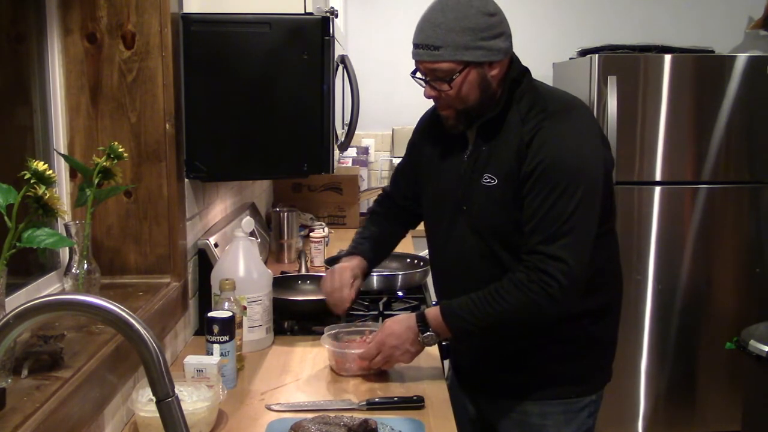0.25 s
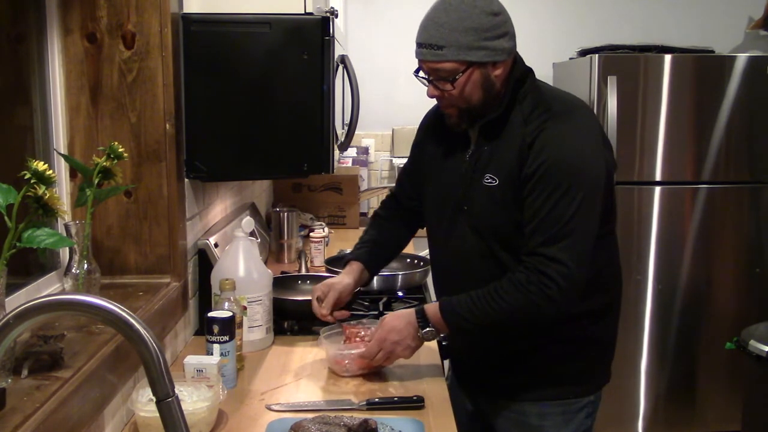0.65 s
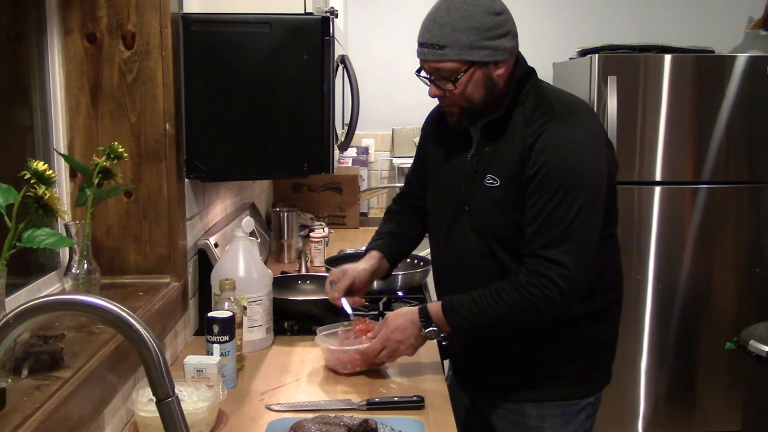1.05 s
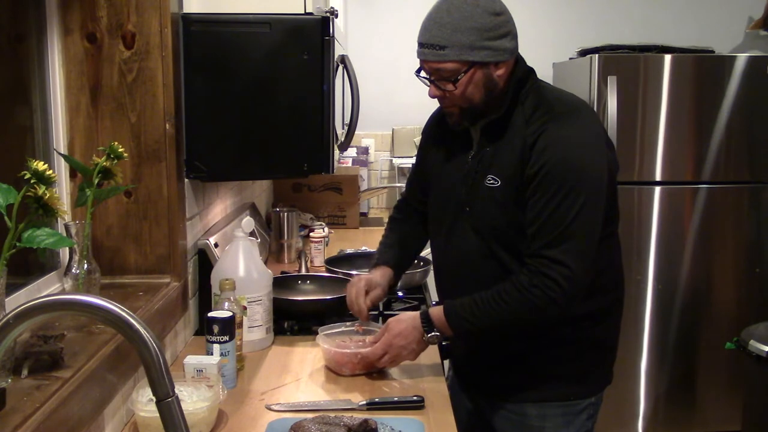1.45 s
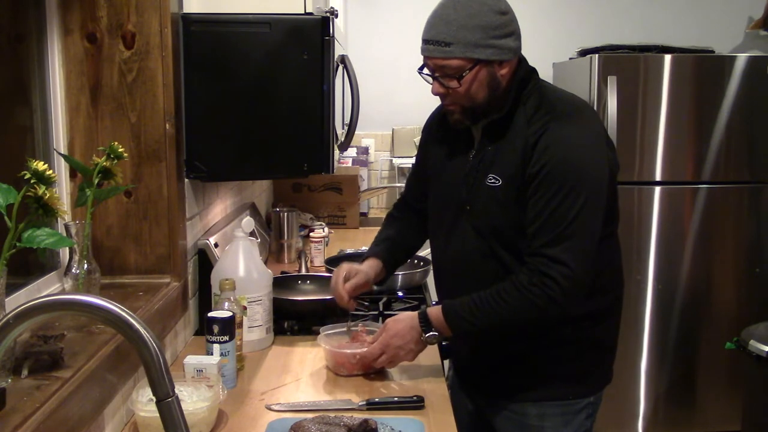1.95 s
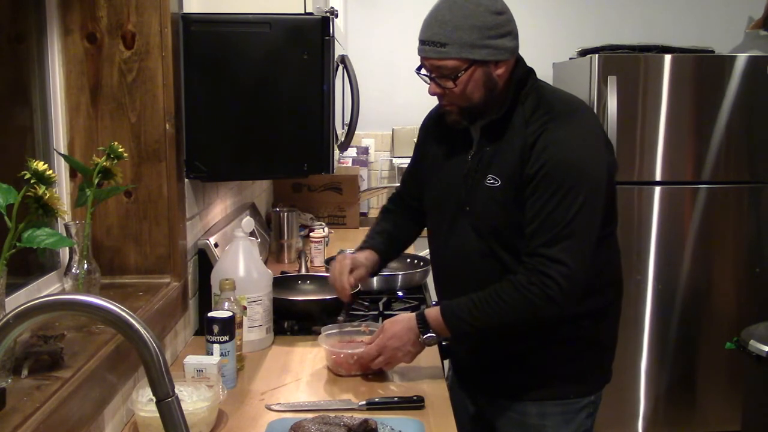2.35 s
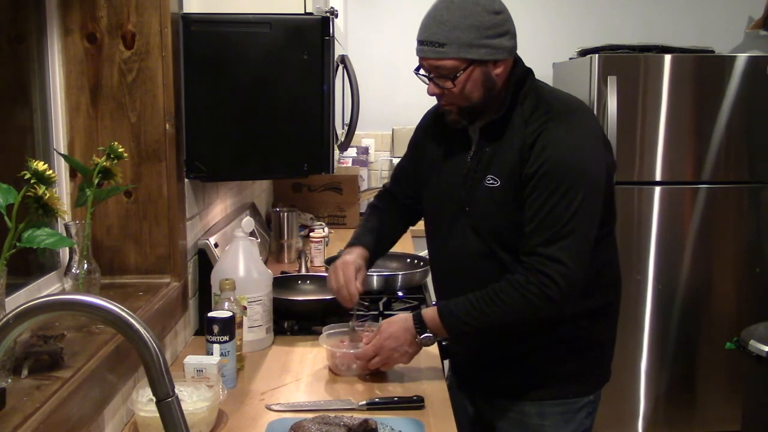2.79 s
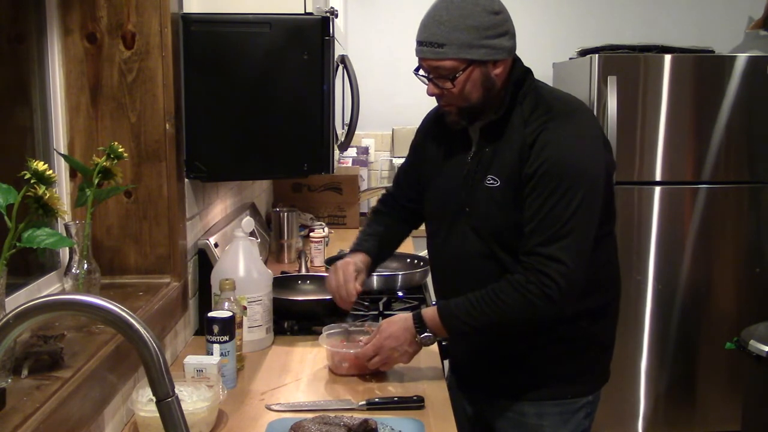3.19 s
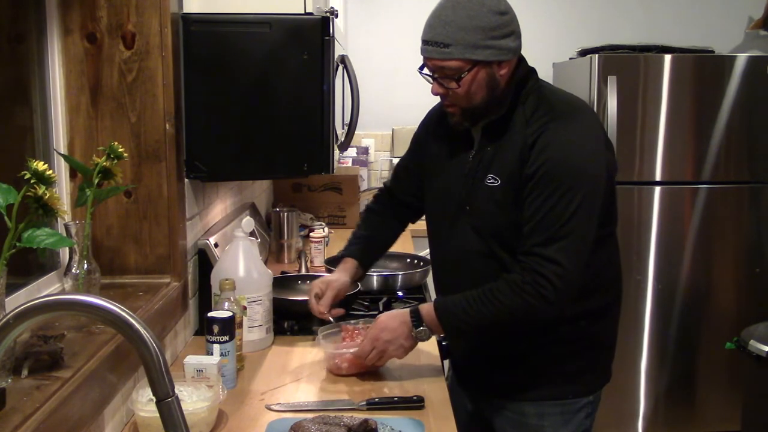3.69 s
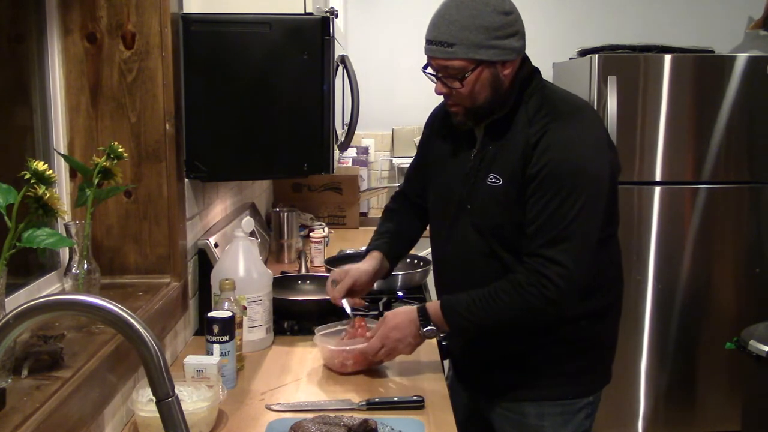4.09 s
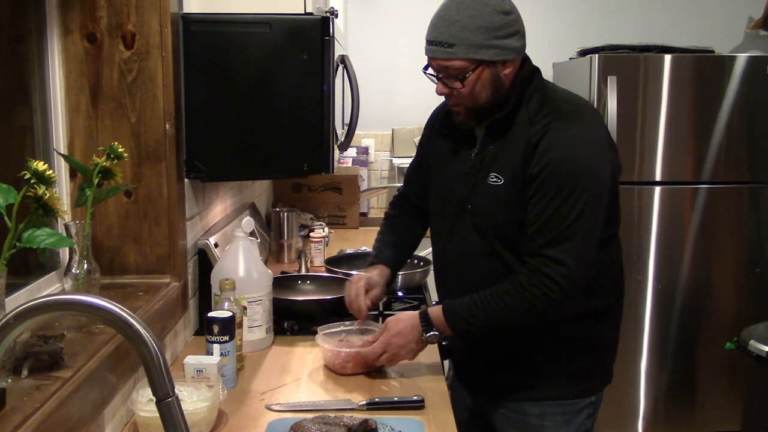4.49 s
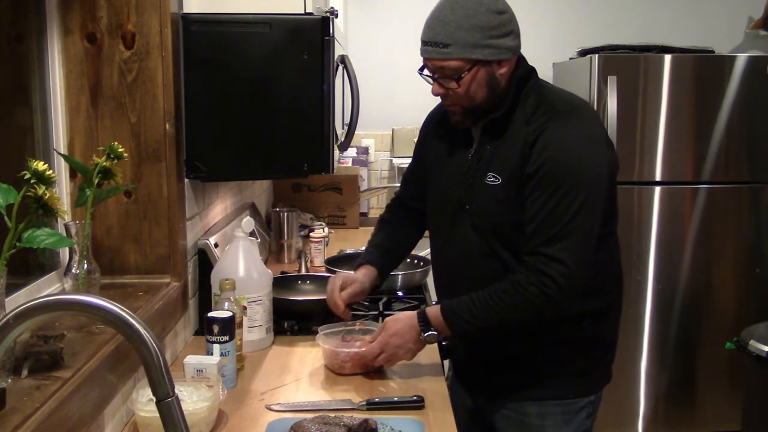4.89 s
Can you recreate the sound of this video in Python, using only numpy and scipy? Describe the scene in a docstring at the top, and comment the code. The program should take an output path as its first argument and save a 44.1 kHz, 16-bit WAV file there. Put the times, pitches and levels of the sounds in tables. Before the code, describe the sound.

Over the steady hum of a refrigerator, a plastic tub gives a hollow knock on a kitchen counter, followed by faint squeaky scraping as a metal spoon works through chopped vegetables. Irregular clacks and knocks follow, then another squeaky scrape, and finally a sharp clack and the loudest knock. Everything comes from straight ahead, a few metres off, with the short echo of a small kitchen.

```python
"""A plastic tub knocks hollowly on a kitchen counter as a metal spoon stirs chopped vegetables in it.
The spoon clacks on the tub's wall; between the blows it scrapes, squeaks and taps through the wet mix.
The stereo microphone stands a few metres off, with the tub nearly straight ahead.
The small bright kitchen echoes it all over the hum of a refrigerator."""
import sys
import numpy as np
from scipy import signal
from scipy.fft import rfft, irfft
from scipy.io import wavfile
from scipy.ndimage import uniform_filter1d

SR = 44100
rng = np.random.default_rng(int(sys.argv[2]) if len(sys.argv) > 2 else 0)


def transcribe(signal):
    """Save signal, clipped to [-1, 1], as a 16-bit WAV file at the path in sys.argv[1]."""
    frames = np.atleast_2d(signal).T
    limited = np.clip(frames, -1, 1)
    pcm = np.round(limited * 32767).astype(np.int16)
    wavfile.write(sys.argv[1], SR, pcm)


N = 226892
T = np.arange(N) / SR
RING_T = T[:SR // 2]  # the half second given to one blow or echo


# Blows at the counter: t/s, level/dB, spoon share (0 = tub knocks on counter, 1 = spoon clacks on tub),
# weight/dB of bass, hardness/(dB per octave of treble), pitch ratio of the struck place
KNOCKS_AND_CLACKS = [(0.3152, -19.5, .03, -0.5, 0.3, 0.98), (0.414, -30, 0.14, -4, -3, 1),
                     (1.683, -31, 0.37, -3.5, 3.5, 0.94), (1.724, -27, 0.55, 2.5, 1, 1.03),
                     (1.795, -39.5, 0.73, 7.5, 2, 0.9), (2.193, -30.5, 1, -2.5, 1.3, 1.15),
                     (2.4429, -35, 0.058, -2.5, -3.2, 1.06), (2.5132, -43.5, 0.15, -7, 4.5, 0.9),
                     (2.5506, -26, 0.04, 1.5, 1.5, 1.08), (2.642, -36, 0.82, 3.5, 2.3, 1.12),
                     (3.035, -35.5, 0.67, -7.5, 1.8, 1.05), (3.271, -26, 0.11, -9, -1.7, 0.88),
                     (3.343, -18.5, 0.23, 2.5, -0.9, 1.17), (3.5, -48.5, .5, -3, 7.5, 0.93),
                     (3.545, -38, 0.17, -4, 2.5, 1.14), (4.4457, -21.5, 0.94, -2.5, 0, 1.13),
                     (4.7735, -16, .02, -3, 1, 1.02), (4.826, -31.5, 0.87, 0, -2.5, 1.34)]
# Modes of the tub standing on the counter: f/Hz, relative level/dB, t60/s
TUB_MODES = [(206.3, -7, 0.45), (241.9, -3.5, 0.3), (269.4, 1, .27), (325, -7.5, 0.35), (388.8, 6, 0.13),
             (451, -9.5, 0.35), (528, -14.5, 0.34), (608, -2.5, 0.044), (660, 0.5, 0.12), (746, -1, 0.11),
             (931, -12.5, 0.28), (1150, -19.5, 0.047), (1316, 3, 0.11), (1407, -19.5, 0.6)]


def blows(crack_db=-0.5, ring_db=1.0, crack_bass_db=-6, swell_s=0.0085):
    """Each blow cracks in its own colour and rings the tub, whose modes take up that colour."""
    out = np.zeros(N)
    mode_hz, mode_db, mode_t60 = np.transpose(TUB_MODES)
    for start, level_db, share, weight_db, hardness_db, pitch in KNOCKS_AND_CLACKS:
        hz, db = blow_colour(share, weight_db, hardness_db, pitch)
        room = kitchen_echo()  # the tub turns in the hand, so each blow meets other echoes
        crack = np.column_stack([hz, db + crack_bass_db * bass(hz)])  # the modes carry most of the bass
        add(out, start, undb(level_db + crack_db) * contact(room, crack))
        scatter_db, detune, phases = rng.standard_normal((3, len(TUB_MODES)))
        drive_db = level_db + np.interp(np.log(mode_hz), np.log(hz), db + 10 * np.log10(hz))
        gains = undb(drive_db + mode_db + ring_db + scatter_db)
        shifted_hz = mode_hz * (1 + 0.0056 * detune)  # grip and filling shift the modes a little
        ring = sum(gain * np.sin(2 * np.pi * f * RING_T + np.pi * phase) * fade(t60)
                   for gain, f, phase, t60 in zip(gains, shifted_hz, phases, mode_t60))
        add(out, start, ring * (1 - np.exp(-RING_T / swell_s)))
    return out


# Spectra of the two kinds of contact: f/Hz, hollow knock level/dB, sharp clack level/dB
BLOW_SPECTRA = [(28, -45, -23), (54.3, -18, 4), (108, -27, -12), (159, -8.5, -6), (234, -1.5, -3.5),
                (505, 0, -4), (710, 2.5, -4), (947, -4, -5), (1296, -8.5, 3), (2080, -16, -3.5),
                (3300, -25, -9.5), (5600, -26, -20.5), (8400, -31.5, -29.5), (14500, -52, -52)]


def blow_colour(share, weight_db, hardness_db, pitch, treble_hz=1650):
    """Unit-power blend of knock and clack: weight adds bass, hardness treble, a stiff place pitch."""
    hz, knock, clack = np.transpose(BLOW_SPECTRA)
    db = knock + np.clip(share, 0, 1) * (clack - knock)
    db = db + weight_db * bass(hz) + hardness_db * np.maximum(np.log2(hz / treble_hz), 0)
    hz = hz * pitch ** (1 - bass(hz))
    power = np.sum(undb(db) ** 2 * np.gradient(hz))
    return hz, db - 10 * np.log10(power)


def bass(hz, edge_hz=570):
    """1 where the tub moves as a whole, 0 above, changing over half an octave."""
    return np.clip(.5 - 2 * np.log2(hz / edge_hz), 0, 1)


def contact(room, spectrum, chatter=0.3, chatter_t60=0.011, touch=0.65, spread_db=1.4, nominal_s=.03):
    """A sharp touch and a moment of chatter, heard across the room in the given spectrum."""
    force = chatter * rng.standard_normal(len(RING_T)) * fade(chatter_t60)
    force[0] += touch
    burst = whiten(signal.fftconvolve(force, room)[:len(RING_T)])
    # each place on the tub's wall favours other upper resonances
    hz = np.geomspace(900, 12000, 26)
    ripple_db = spread_db * rng.standard_normal(len(hz)) * signal.windows.tukey(len(hz), alpha=0.1)
    place_db = along(np.column_stack([hz, ripple_db]), len(RING_T))
    gain = SR * np.sqrt(nominal_s / 2)  # the energy of that spectrum held for nominal_s
    return gain * colour(burst, along(spectrum, len(RING_T)) + place_db)


# Soft taps of the spoon through the vegetables: t/s, relative level/dB, f/Hz
SPOON_TAPS = [(0.263, -33, 1070), (0.5256, -47, 1240), (0.7219, -48.5, 1150), (0.8755, -53.5, 1150),
              (0.9718, -53.5, 1150), (1.0027, -56.5, 1270), (1.1524, -52.5, 1000), (1.2624, -54, 1160),
              (1.2891, -52.5, 1320), (1.3184, -54, 1100), (3.7869, -54, 1080), (3.9371, -42.5, 1165),
              (4.384, -51, 1100), (4.668, -42, 1130), (4.7145, -50.5, 1230), (5.0848, -44.5, 950),
              (5.121, -53, 865), (5.136, -40.5, 1060)]
# Spectrum of one tap: multiple of its pitch, level/dB
TAP_SPECTRUM = [(.2, -16), (.6, -4.5), (1, 0), (1.22, -0.5), (1.55, -18.5), (4, -31.5), (10, -45)]


def taps(room, tap_db=-27):
    """Cushioned by the filling, a tap is one broad, dull resonance."""
    out = np.zeros(N)
    for start, db, hz in SPOON_TAPS:
        spectrum = [(ratio * hz, ratio_db) for ratio, ratio_db in TAP_SPECTRUM]
        add(out, start, undb(db + tap_db) * contact(room, spectrum, chatter=0.14))
    return out


# Spoon strokes: t/s, length/s, hiss level/dB, relative rasp level/dB, t60/s of the mix settling
SPOON_STROKES = [(0.546, 0.075, -51.5, -47.5, 0.86), (0.68, 0.015, -57, -59, 4.3),
                 (1.41, 0.026, -59.5, -54, 0.46), (2.138, 0.038, -66, -46.5, 0.22),
                 (2.948, 0.082, -62, -53, .2), (3.567, .16, -49.5, -48.5, 0.73),
                 (4.391, 0.043, -59.5, -51, 0.29)]
# Spectra of the hiss along the tub's wall and of the rasp through the mix: f/Hz, level/dB
WALL_HISS = [(300, -14), (1500, 4.5), (3000, -2.5), (5200, 0.5), (8000, -3.5), (10000, -9), (14000, -17),
             (16000, -29)]
MIX_RASP = [(400, -40), (1000, 5), (1600, 1.5), (2600, -1), (4500, -9.5), (9000, -27)]


def stirring(room, rasp_db=-4.5, wet_db=-67, catch_db=2.0, attack_s=0.031, hiss_t60=0.095):
    """The spoon sticks and slips along the wall; the mix settles after it and crackles throughout."""
    hiss, rasp = np.zeros((2, N))
    for start, length, wall_db, mix_db, settle_t60 in SPOON_STROKES:
        hiss += undb(wall_db) * gesture(start, length, attack_s, hiss_t60)
        rasp += undb(mix_db + rasp_db) * gesture(start, length, attack_s, settle_t60)
    squeaking = squeaks()
    scrape = hiss * shaped(grains(500), WALL_HISS) + rasp * shaped(grains(1200), MIX_RASP)
    scrape *= undb(catch_db * walk(70))  # the spoon catches on the pieces
    wet_spectrum = [(500, -15), (1400, -0.5), (5000, -16), (10000, -17.0), (16000, -26)]
    crackle = undb(wet_db + 2 * walk(5.5)) * shaped(grains(64), wet_spectrum)
    return signal.fftconvolve(scrape + squeaking + crackle, whiten(room))[:N]


def grains(per_second):
    """Tiny slips and wet pops of unequal size."""
    size = undb(3.5 * np.minimum(rng.exponential(size=N), 4))
    return (rng.random(N) < per_second / SR) * rng.choice([-1, 1], N) * size


# Squeaks of the spoon: t/s, length/s, f/Hz, level/dB, wander as a share of the pitch
SPOON_SQUEAKS = [(0.534, 0.028, 3540, -45.5, 0.029), (0.535, 0.025, 5150, -41, 0.07),
                 (0.535, 0.015, 9500, -46, 0.087), (0.663, 0.028, 4620, -51, .02),
                 (0.671, .031, 8800, -50, 0.083), (0.698, .04, 9240, -58, .06),
                 (0.75, .025, 10100, -63, .03), (3.618, 0.039, 6700, -44.5, .11),
                 (3.642, 0.041, 4950, -41.5, 0.173), (3.675, 0.037, 3730, -42.5, .17),
                 (3.727, 0.019, 8500, -44, .18)]


def squeaks():
    """Metal sticks and slips on wet plastic in brief tones of unsteady pitch."""
    out, wander = np.zeros(N), walk(900)
    for start, length, hz, db, spread in SPOON_SQUEAKS:
        pitch = hz * (1 + spread * wander[int(start * SR):int((start + length) * SR)])
        tone = np.sin(2 * np.pi * np.cumsum(pitch) / SR)
        add(out, start, undb(db) * tone * signal.windows.hann(len(tone)))
    return out


# Drags of the tub across the counter: t/s, length/s, level/dB
TUB_DRAGS = [(1.405, .03, -61), (1.764, 0.42, -56.5)]


def counter_rumble(attack_s=0.022, t60=0.22):
    """The worktop answers the dragged tub with a low rumble."""
    envelope = sum(undb(db) * gesture(start, length, attack_s, t60) for start, length, db in TUB_DRAGS)
    spectrum = [(30, -33), (55, -4), (85, -14), (110, -1.5), (160, -20), (400, -45), (2000, -80)]
    return envelope * shaped(rng.standard_normal(N), spectrum)


# How long the small kitchen rings: f/Hz, t60/s
KITCHEN_DECAY = [(100, 0.11), (400, 0.5), (1500, 0.36), (3000, 0.4), (6000, 0.31), (14000, 0.24)]


def kitchen_echo(slap_db=0.5, near_db=-2, near_t60=0.11, tail_db=-3.5, build_s=0.015):
    """Tub to microphone: direct sound, slaps off counter and wall, cupboard scatter, a diffuse tail."""
    size = len(RING_T)
    early = np.zeros(size)
    early[0] = 1
    for lag_s, db in [(.0016, -1), (.0046, -4), (.0072, -2.5)]:
        add(early, lag_s, undb(slap_db + db) * unit(rng.standard_normal(64)) / np.sqrt(64))
    noise, t60 = rfft(rng.standard_normal(size)), along(KITCHEN_DECAY, size)
    octave = np.log2(np.arange(len(noise)) + 1).astype(int)
    tail = sum(irfft(noise * (octave == k), size) * fade(t60[octave == k].mean())
               for k in np.unique(octave))
    near = rng.standard_normal(size) * fade(near_t60)
    build = 1 - np.exp(-RING_T / build_s)
    diffuse = undb(near_db) * unit(near * build) + undb(tail_db) * unit(tail * build)
    return early + diffuse / np.sqrt(size)


# Room tone, the fan's noise filling the kitchen: f/Hz, relative level/dB
ROOM_TONE = [(25, -27), (50, -23.5), (90, -17.5), (160, -15.5), (250, -4), (400, -6), (520, -9.5),
             (900, -11.5), (1500, -20), (2500, -23), (4200, -31), (8000, -37), (11000, -42.5), (16000, -52)]
# Tones of the refrigerator's motor and fan: f/Hz, level/dB
MOTOR_TONES = [(215.3, -66), (253, -60), (360.7, -55), (613.7, -69)]
# Mains hum, swelling for a while: t/s, level/dB
MAINS_SWELL = [(0, -66), (.5, -67), (.7, -61.5), (1.2, -59.5), (1.4, -72), (5.14, -68)]


def refrigerator(air_db=-50.38, side_db=-16.5, mains_hz=119):
    """Steady fan noise with slightly wavering motor tones and a mains hum, in stereo."""
    air = undb(air_db) * shaped(rng.standard_normal(N), ROOM_TONE)
    # left and right agree best in the low middle range
    side_spectrum = [(hz, db + np.interp(np.log(hz), np.log([60, 250, 3000]), [7, -9, 0]))
                     for hz, db in ROOM_TONE]
    side = undb(air_db + side_db) * shaped(rng.standard_normal(N), side_spectrum)
    motor = sum(undb(db + 0.7 * walk(4.55)) * np.sin(2 * np.pi * hz * T + 0.63 * walk(2.8))
                for hz, db in MOTOR_TONES)
    mains = undb(np.interp(T, *np.transpose(MAINS_SWELL))) * np.sin(2 * np.pi * mains_hz * T)
    return air + np.sqrt(2) * (motor + mains) + side * np.array([[1], [-1]])


def gesture(start, length, attack_s, t60):
    """Envelope of a hand movement: swells up to its start, holds, dies away."""
    attack = np.clip(1 + (T - start) / attack_s, 0, 1) ** 2
    return attack * np.exp(-np.log(1000) * np.maximum(T - start - length, 0) / t60)


def fade(t60):
    """An exponential decay, 60 dB down after t60 seconds."""
    return np.exp(-np.log(1000) * RING_T / t60)


def walk(rate_hz):
    """A random wander of rms 1."""
    hold = int(SR / rate_hz)
    steps = np.repeat(rng.standard_normal(N // hold + 1), hold)
    return unit(uniform_filter1d(steps, hold)[:N])


def along(points, size):
    """Read (Hz, value) points at the bins of a transform, on a log axis."""
    hz, value = np.transpose(points)
    return np.interp(np.log(np.fft.rfftfreq(size, 1 / SR) + 1), np.log(hz), value)


def colour(x, db):
    """Causal filter with the given gain per bin, from the cepstrum."""
    cepstrum = irfft(np.log(undb(db)), len(x))
    cepstrum[1:len(x) // 2] *= 2
    cepstrum[len(x) // 2 + 1:] = 0
    return irfft(rfft(x) * np.exp(rfft(cepstrum)), len(x))


def whiten(x):
    """Even out the broad spectrum of a burst, keeping its resonances."""
    power = uniform_filter1d(np.abs(rfft(x)) ** 2, size=300)
    return colour(x, -10 * np.log10(np.abs(power) + 1e-18))


def shaped(x, spectrum):
    """A long sound filtered by (Hz, dB) points, rms 1."""
    return unit(irfft(rfft(x) * undb(along(spectrum, N)), N))


def add(track, start, x):
    """Mix x into the track from start seconds on."""
    i = max(int(start * SR), 0)
    part = x[:max(N - i, 0)]
    track[i:i + len(part)] += part


def undb(db):
    """Decibels to gain."""
    return 10 ** (np.asarray(db) / 20)


def unit(x):
    """Scale to rms 1."""
    return x / np.sqrt(np.mean(x ** 2))


def scene(wide_db=-20, lean_db=.22):
    """The tub is a few metres off, nearly straight ahead; its echoes spread a little to the sides."""
    room = kitchen_echo()
    tub = blows() + taps(room) + stirring(room)
    spread = whiten(rng.standard_normal(len(RING_T)) * RING_T * fade(0.024))
    side = undb(wide_db) * signal.fftconvolve(tub, spread)[:N]
    side = signal.sosfilt(signal.butter(1, 1000, "high", fs=SR, output="sos"), side)
    balance = undb([[lean_db], [-lean_db]])
    return tub * balance + side * np.array([[1], [-1]]) + refrigerator() + counter_rumble()


def record(dry, low_cut_hz=39, top_hz=15700):
    """The recorder thins the deepest bass and cuts the top."""
    thinned = signal.sosfilt(signal.butter(4, low_cut_hz, "high", fs=SR, output="sos"), dry)
    return signal.sosfilt(signal.ellip(8, .2, 70, top_hz, fs=SR, output="sos"), thinned)


dry = scene()
out = record(dry)
transcribe(out)
```